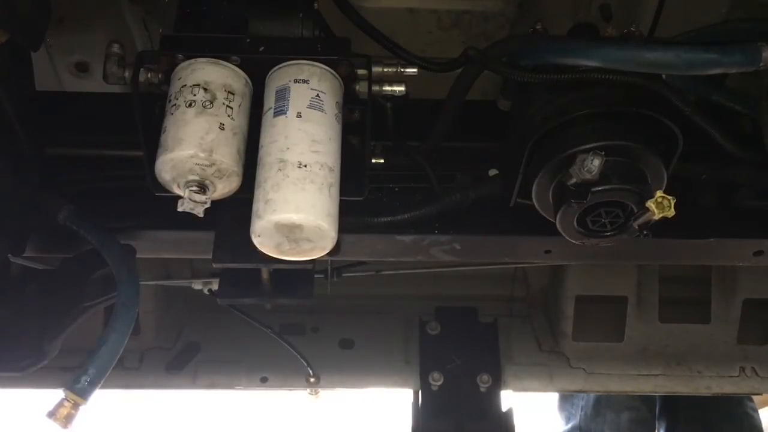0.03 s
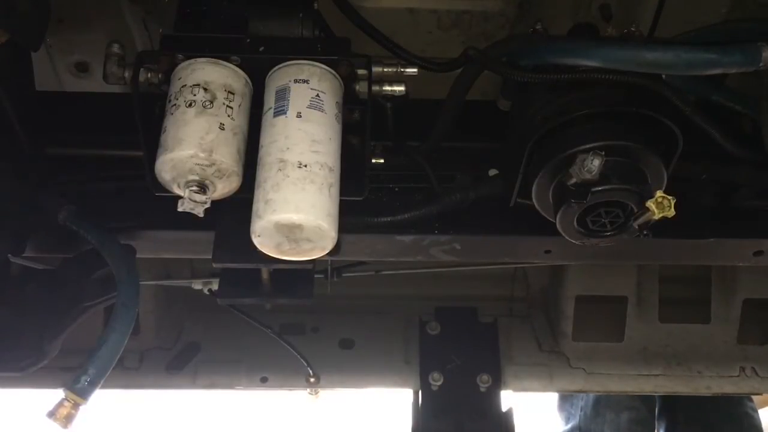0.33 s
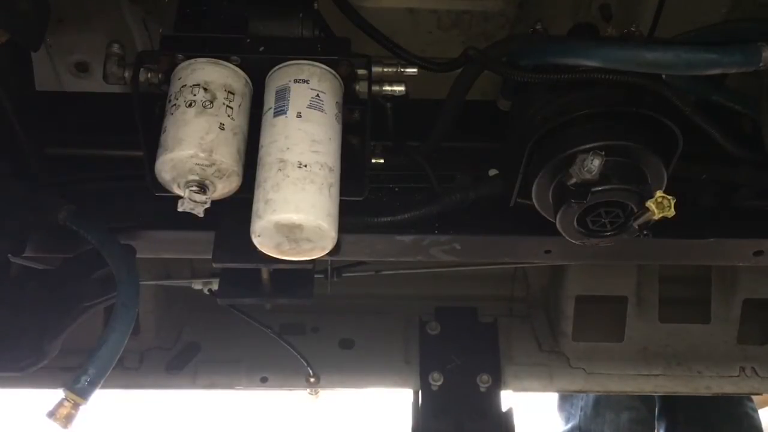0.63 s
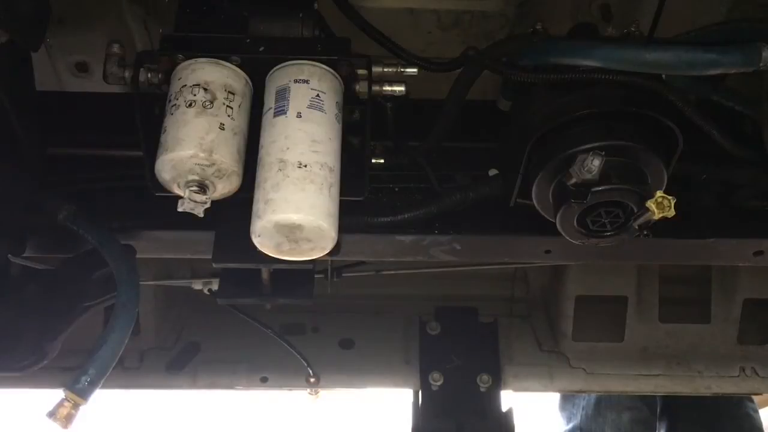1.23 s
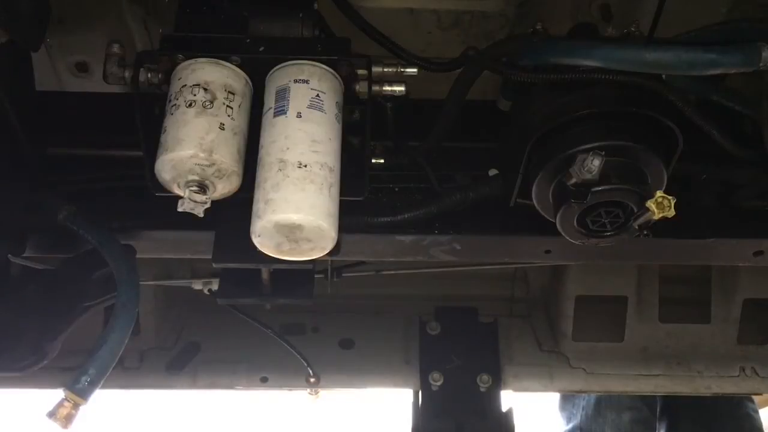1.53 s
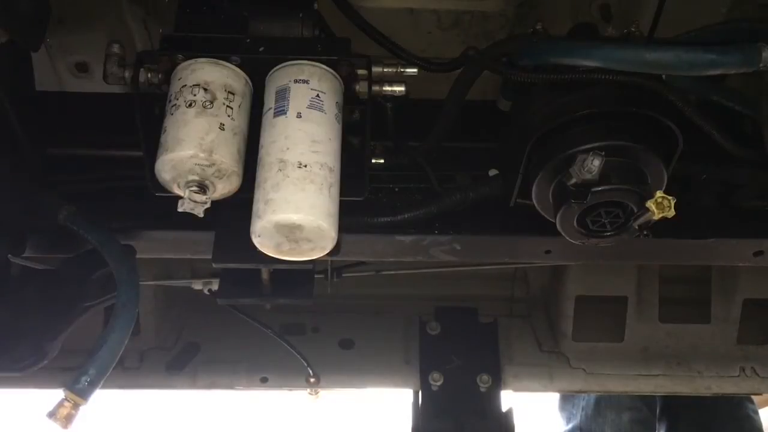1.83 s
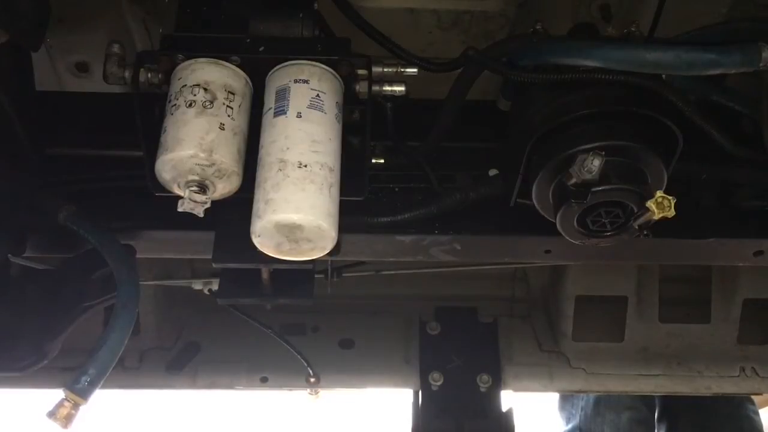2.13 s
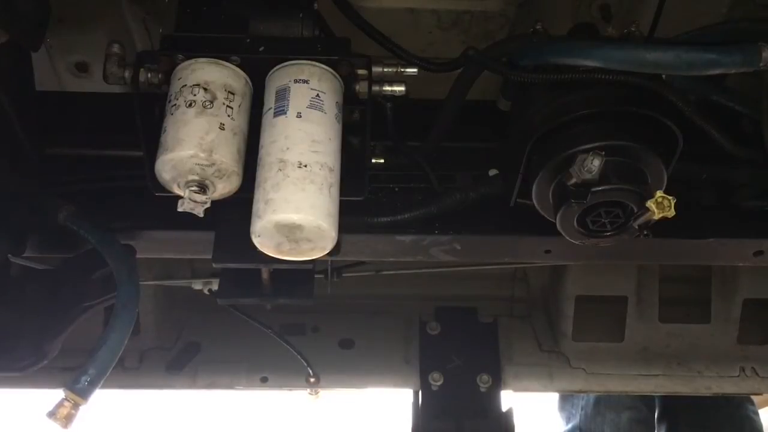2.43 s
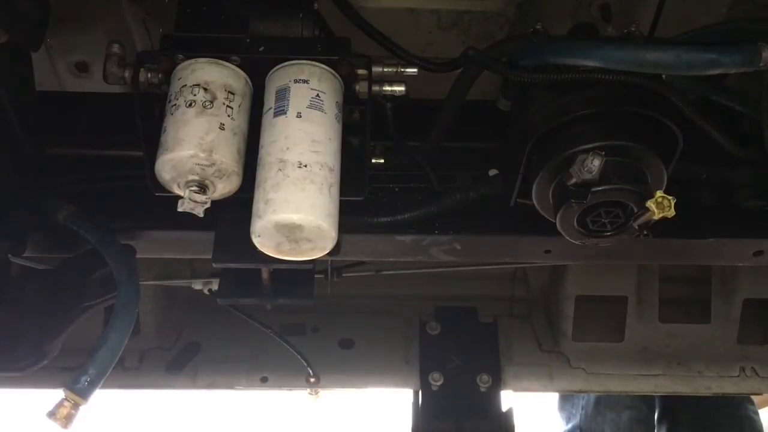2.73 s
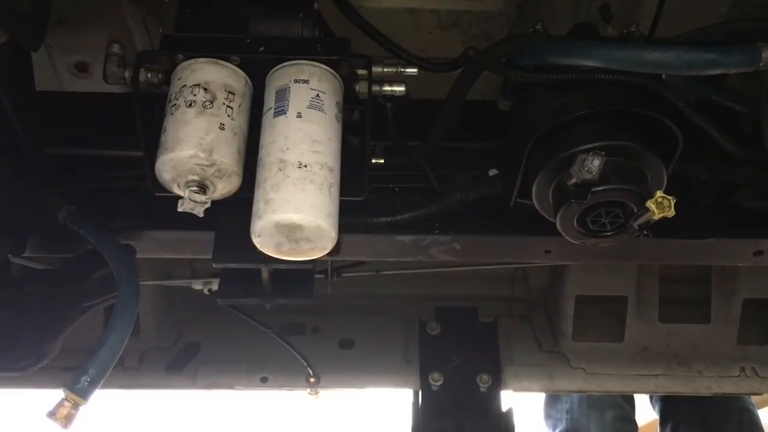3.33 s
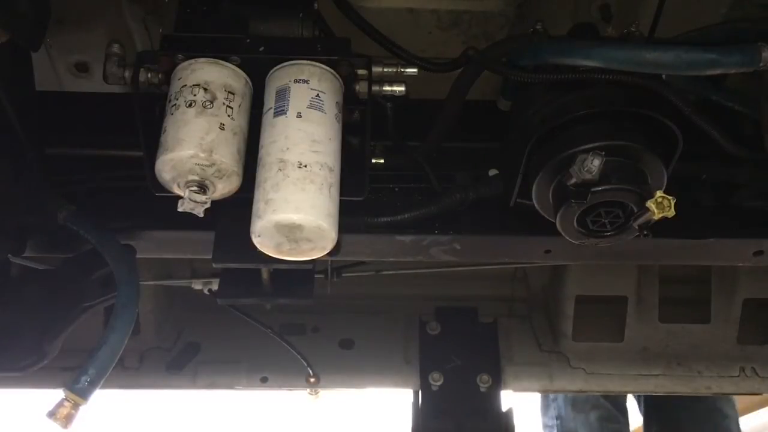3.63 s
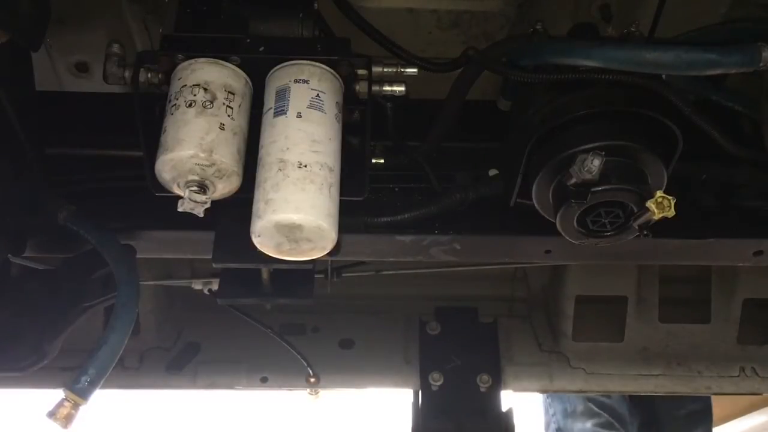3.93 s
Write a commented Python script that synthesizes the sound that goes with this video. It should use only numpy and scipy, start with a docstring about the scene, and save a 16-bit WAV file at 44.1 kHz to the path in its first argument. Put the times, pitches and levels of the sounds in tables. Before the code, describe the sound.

A starter motor cranks a truck's diesel engine in rapid grinding pulses, heard close up underneath. The engine does not fire, and the starter coasts to rest. A few small metal clicks follow over a faint, distant engine hum.

```python
"""Under a truck, one microphone close to the starter, with short echoes between frame and ground.
The electric starter cranks the diesel through 21 grinding compression strokes; it does not fire.
Each stroke slows the engine and loads the gear teeth, which ring the bell housing. The starter drops
out, the engine rocks back with two short hollow hoots, and the freed armature coasts to rest.
Farther off, a low engine drone carries on; close by come a few small clicks and a squeak."""
import sys
import numpy as np
from scipy import signal
from scipy.fft import rfft, irfft, next_fast_len
from scipy.io import wavfile
from scipy.ndimage import map_coordinates

SR = 44100
rng = np.random.default_rng(int(sys.argv[2]) if len(sys.argv) > 2 else 0)


def generate_wav(signal):
    """Clip the signal to [-1, 1] and save it as 16-bit WAV at the path in sys.argv[1]."""
    frames = np.transpose(np.atleast_2d(signal))
    scaled = np.clip(frames, -1, 1) * 32767
    pcm = np.round(scaled).astype(np.int16)
    wavfile.write(sys.argv[1], SR, pcm)


N = 176400

# compression strokes: start_s, grind_gain_db, low_tone_gain_db, peak_speed_share, under_load_s
COMPRESSIONS = [(-.018, 0.5, 3.5, .93, .06), (.069, -1, 3, 0.95, 0.061), (.169, 1.5, 2, 0.98, 0.039),
                (0.247, 0.5, 1, 1, 0.049), (.337, 1, 1, 0.98, 0.039), (.419, 1.5, 2, 1, 0.037),
                (0.499, 1.5, -0.5, 0.98, 0.04), (.579, 1, -2, 1, 0.035), (.656, 1.5, 0, 1, 0.035),
                (.729, 1.5, 2.5, .99, 0.05), (.818, 0, 3, 0.98, 0.039), (0.898, 0.5, -1.5, 0.99, .042),
                (.978, 1.5, 0.5, 1, 0.038), (1.059, 2, -3, 0.99, 0.035), (1.138, 1.5, 1.5, 1, 0.039),
                (1.216, 1.5, -0.5, 1, 0.037), (1.293, 1, 1, 0.99, 0.038), (1.367, 2, -0.5, 0.99, 0.035),
                (1.445, 1, -2.5, 1, 0.043), (1.525, 0.5, -1, 1, 0.041), (1.604, -1, -3, 0.96, .03)]
# gear tones, each sounding for part of a stroke: tooth_rate_multiple, gain_db, delay_s, decay_s
MESH_TONES = [(.76, -35.5, 0.0093, 0.24), (1.66, -20, .001, 0.012), (2.72, -21, 0.029, .2),
              (3.02, -16.5, 0.01, 0.038), (6.15, -13.5, 0.0087, 0.028), (5.9, -14.5, .032, 0.03),
              (9.35, -26.5, .002, 0.0092), (11.6, -20.5, 0.0056, 0.037), (12.3, -15, .003, 0.015)]
# broad response of bell housing and chassis: frequency_hz, gain_db
HOUSING_SHAPE = [(60, -40), (100, -25.5), (170, -5), (250, -2), (319, -13), (362, -8), (508, -5),
                 (590, -20.5), (861, -6.5), (1090, -10), (1160, -3), (1490, -2), (1960, -8), (2320, -6),
                 (2580, -14), (2810, -10.5), (3180, -3), (3610, -12), (4100, -8), (4860, -13.5), (6950, -7),
                 (7560, -13), (9500, -17.5), (10400, -24.5), (12500, -22.5), (15500, -37)]
# narrow housing resonances: pitch_hz, width_hz, gain_db
HOUSING_MODES = [(367, 18, -6.5), (511.8, 45.5, 2.5), (862, 120, -5.5), (1165, 18, 8), (1311, 21, -5.5),
                 (1544, 170, -2.5), (2414, 41, -6.5), (2890, 34, -1), (3080, 17, 1), (3286, 24, -0.5),
                 (3464, 32, -0.5), (3910, 38, 7.5), (5280, 60, -9.5), (6230, 15, 0.5), (6730, 55, -1.5),
                 (7090, 30, -8.5)]
# spectrum of the scraping teeth: frequency_hz, gain_db
SCRAPE_SHAPE = [(100, -35), (2000, -10), (4700, -12.5), (5300, 0.5), (6900, -9), (7700, -7), (9500, -12),
                (10500, -17.5), (15500, -22.5)]
# spectrum of the air pumped by the cylinders: frequency_hz, gain_db
PUFF_SHAPE = [(20, -42), (35, -26), (45, -1.5), (52, 8.5), (59, -3.5), (72, -2), (97, -23), (130, -16.5),
              (200, -50)]
# loudness of that air: time_s, level_db
PUFF_LEVELS = [(0, -30), (.38, -34.5), (.48, -25.5), (.72, -35.5), (.92, -24), (1.04, -27), (1.14, -33),
               (1.5, -26.5), (1.78, -27), (1.95, -38.5), (2.5, -53), (3, -66)]
# spectrum of the brushes on the coasting armature: frequency_hz, gain_db
BRUSH_SHAPE = [(150, -9), (250, -1.5), (400, -15.5), (520, -10.5), (600, -12.5), (700, -10), (1010, -4.5),
               (1100, -9), (1430, 1), (1730, -15.5), (2090, -6), (2400, -1.5), (2600, -9), (2850, -0.5),
               (3400, -7.5), (4800, -10.5), (5300, -8.5), (6000, -11), (7500, -20.5), (9000, -15),
               (10400, -27.5), (12400, -24.5), (15500, -37)]
# loudness of the brushes: time_s, level_db
BRUSH_LEVELS = [(1.62, -60), (1.66, -32), (1.83, -33), (1.9, -30.5), (2.08, -30.3), (2.25, -33.5),
                (2.42, -35.5), (2.5, -35.5), (2.55, -42), (2.585, -43), (2.605, -38.5), (2.645, -44.5),
                (2.715, -44), (2.78, -47), (2.85, -50), (2.93, -70), (3, -110)]
# hoots as the engine rocks back: start_s, length_s, pitch_hz, rise_share, level_db
ROCK_BACK_HOOTS = [(1.769, 0.044, 650, 0.12, -26.5), (1.786, 0.042, 400, 0.098, -21.5)]
# one thin squeak: start_s, length_s, pitch_hz, rise_share, level_db
THIN_SQUEAK = (3.803, .048, 6150, .2, -45)
# small metal clicks and knocks: start_s, level_db, centre_hz, width_octaves, decay_s
METAL_CLICKS = [(1.619, -16.5, 1280, 1.8, 0.015), (1.67, -21, 5540, 0.94, 0.0096),
                (1.679, -36, 14000, .25, 0.013), (1.853, -28.5, 590, 0.36, 0.021),
                (1.879, -26.5, 4960, 0.65, 0.0081), (2.785, -41, 430, 0.83, 0.049),
                (2.813, -37, 4000, 2, 0.01), (3.278, -52, 6000, .7, .003), (3.316, -44, 4460, 0.59, 0.0026),
                (3.383, -32.5, 2700, 0.67, 0.0021), (3.415, -38, 3550, 0.28, 0.012),
                (3.422, -31.5, 3470, 1.4, 0.0065), (3.436, -36.5, 3300, 1.7, 0.0072),
                (3.449, -44, 6000, 1, 0.0055), (3.634, -61, 8850, 0.36, .005),
                (3.879, -40, 1100, 1.19, 0.012), (3.93, -46, 2680, 0.63, 0.0094),
                (3.958, -53, 6000, 1, .004), (3.994, -51, 5000, 1, .005)]
# the engine farther off: time_s, pitch_hz, gain_db (on top of DRONE_DB)
DRONE_COURSE = [(1.9, 85.5, -46), (1.97, 93.2, -40), (2.69, 94.7, -34), (2.83, 106, -35.5),
                (3.09, 95.7, -27), (3.17, 86.6, -53), (3.27, 92.7, -28.5), (3.68, 94.0, -32.5),
                (3.83, 85.3, -40.5), (4.0, 95.1, -35)]
# spectrum of the open air: frequency_hz, gain_db
AIR_SHAPE = [(15, -51), (30, -22.5), (45, -14.5), (62, -7.5), (96, -4.5), (133, -15), (204, -14.5),
             (260, -28), (360, -31), (500, -37.5), (750, -36), (1020, -32), (1400, -34), (2000, -38),
             (3200, -47), (6000, -56.5), (9000, -61), (10500, -65.5), (15500, -69.5)]
# spectrum of a faint shuffling: frequency_hz, gain_db
SHUFFLE_SHAPE = [(200, -9), (800, -15), (3000, -3.5), (5000, -11.5), (7300, -11), (10000, -20),
                 (15500, -29.5)]
# loudness of the shuffling: time_s, level_db
SHUFFLE_LEVELS = [(3.72, -84), (3.8, -56), (3.9, -57), (4, -57)]

MESH_HZ, SPEED_SAG = 564.9, 0.155  # tooth rate at full speed; share of speed lost in a stroke
ATTACK_S, RELEASE_S = 0.0055, 0.0092  # rise and fall of the tooth load
DROP_OUT_S, DROP_FADE_S = 1.635, 0.016  # the pinion leaves the ring gear
TEETH_DB, TOOTH_JITTER_S, TOOTH_SCATTER_DB = -21.5, 0.00005, 4
GRIND_DB, SCRAPE_DB, SCRAPE_DECAY_S = -19, -20, 0.02
SLACK_DB, SCRAPE_SLACK_DB = -10, -14.5  # load left between strokes
RING_DB, TONE_RING_DB = -22.5, -8  # housing rung by the teeth and by the gear tones
WHINE_RATIO, WHINE_DB = 7.8, -23  # pitch as a multiple of the tooth rate
COAST_TURN_HZ, COAST_STOP_S, RUB_SWING_DB = 42.45, 2.85, 1.5
DRONE_DB, AIR_DB = -3.5, -37.5
ECHO_T60_S, ECHO_DB = 0.12, -5.5
LOW_CUT_HZ, TOP_HZ = 36, 15750


def grinding_gears(teeth):
    """Teeth strike and grind, ringing the housing; the first contact of a stroke scrapes brightest."""
    force = np.hypot(tooth_load(), amp(SLACK_DB) * engaged())
    strike_s = np.interp(np.arange(1, int(teeth[-1])), teeth, clock())
    jitter, scatter = rng.standard_normal((len(strike_s), 2)).T
    index = np.clip(np.round((strike_s + TOOTH_JITTER_S * jitter) * SR).astype(int), 0, N - 1)
    blows = np.bincount(index, amp(TOOTH_SCATTER_DB * scatter), N)
    grind = amp(GRIND_DB) * unit(rng.standard_normal(N))
    drive = force * (amp(TEETH_DB) * unit(blows - blows.mean()) + grind)
    body = drive.std() * unit(coloured(drive, HOUSING_SHAPE))
    ring = amp(RING_DB) * np.sqrt(np.mean(force ** 2)) * unit(filtered(drive, housing_response))
    scrape_force = np.hypot(tooth_load(decay=SCRAPE_DECAY_S), amp(SCRAPE_SLACK_DB) * engaged())
    return body + ring + amp(SCRAPE_DB) * scrape_force * noise(SCRAPE_SHAPE)


def gear_tones(teeth):
    """Rough tones of the loaded gears fall as the engine slows, swelling across the housing's modes."""
    tones = np.zeros(N)
    for multiple, db, delay, decay in MESH_TONES:
        level = amp(db + 3.5 * wobble(200)) * tooth_load(delay, decay, low_tone=multiple < 4)
        tones += level * np.sin(2 * np.pi * multiple * teeth + 0.45 * wobble(380))
    return tones + amp(TONE_RING_DB) * filtered(tones, housing_response)


def crank_speed():
    """Each compression slows the engine until the load lets go; it springs back for the next."""
    knots = []
    for start, _, _, speed, hold in COMPRESSIONS:
        knots.append((start + 0.006, speed))  # fastest just after the teeth load up
        knots.append((start + hold - 0.0032, speed * (1 - SPEED_SAG)))
    return curves(knots)[0]


def tooth_load(delay=0, decay=np.inf, low_tone=False):
    """Force on the teeth rises, holds and lets go in each stroke; low tones have their own gains."""
    force = np.zeros(N)
    lead_s = 0.0014  # the teeth touch just before the compression bites
    for start, grind_db, low_tone_db, _, hold in COMPRESSIONS:
        span = slice(max(int((start - lead_s) * SR), 0), int(start * SR) + SR // 6)
        t = clock()[span] - start
        rise = np.sin(np.pi / 2 * np.clip((t + lead_s - delay) / ATTACK_S, 0, 1)) ** 2
        fall = np.exp(-np.maximum(t - hold, 0) / RELEASE_S - np.maximum(t - delay, 0) / decay)
        force[span] += amp(low_tone_db if low_tone else grind_db) * rise * fall
    return force * engaged()


def engaged():
    """1 while the starter drives the engine, then fading."""
    return np.exp(-np.maximum(clock() - DROP_OUT_S, 0) / DROP_FADE_S)


def housing_response(hz):
    """The bell housing's narrow modes add up with alternating signs."""
    return sum((-1) ** k * amp(db) * 1j * hz * width / (pitch ** 2 - hz ** 2 + 1j * hz * width)
               for k, (pitch, width, db) in enumerate(HOUSING_MODES))


def armature_whine(teeth):
    """The armature sings on between the strokes, rising as the load lets go."""
    level = amp(WHINE_DB + 1.8 * wobble(150)) * engaged()
    return level * np.sin(2 * np.pi * WHINE_RATIO * teeth + 0.87 * wobble(450))


def armature_coast():
    """The freed armature rubs on its brushes, the rub swelling once a turn, ever slower."""
    level_db, = curves(BRUSH_LEVELS)
    turn_hz = COAST_TURN_HZ * np.clip((COAST_STOP_S - clock()) / (COAST_STOP_S - DROP_OUT_S), 0, 1)
    swing_db = RUB_SWING_DB * np.sin(2 * np.pi * np.cumsum(turn_hz) / SR) + 0.76 * wobble(250)
    return amp(level_db + swing_db) * noise(BRUSH_SHAPE)


def cylinder_puffs():
    """Low throb of the air that the cylinders pump."""
    level_db, = curves(PUFF_LEVELS)
    air = noise(PUFF_SHAPE)
    steadied = air / np.abs(signal.hilbert(air)) ** 0.53
    return amp(level_db) * unit(steadied)


def chirp(start, length, hz, rise, db, blur_rad):
    """A hoot or squeak: a short, rough rising tone that swells and fades."""
    progress = np.clip((clock() - start) / length, 0, 1)
    phase = 2 * np.pi * np.cumsum(hz * (1 + rise * np.sin(progress * np.pi / 2))) / SR
    return amp(db) * np.sin(np.pi * progress) * np.sin(phase + blur_rad * wobble(hz / 5))


def metal_clicks():
    """Each contact is a short burst of noise in its own band."""
    out, t = np.zeros(N + SR), np.arange(SR // 5) / SR
    hz = np.fft.rfftfreq(len(t), 1 / SR) + 1
    treble_cut = 1 / np.sqrt(1 + (hz / 10000) ** 4)
    for start, db, centre, octaves, decay in METAL_CLICKS:
        band = treble_cut / (1 + (np.log2(hz / centre) / octaves) ** 2) ** 1.24
        burst = unit(irfft(rfft(rng.standard_normal(len(t))) * band, len(t)))
        out[round(start * SR):][:len(t)] += amp(db) * burst * np.exp(-t / decay)
    return out[:N]


def underside(x):
    """Dense short echoes between frame and ground reach the microphone after the direct sound."""
    t = np.arange(SR // 4) / SR
    tail = rng.standard_normal(len(t)) * amp(-60 * t / ECHO_T60_S) * (t > 0.002)
    return x + amp(ECHO_DB) * signal.fftconvolve(x, tail / np.linalg.norm(tail))[:N]


def engine_drone():
    """An engine farther off hums on one low, wavering tone."""
    hz, db = curves(DRONE_COURSE)
    level = amp(DRONE_DB + db + 1.8 * wobble(22))
    return level * np.sin(2 * np.pi * np.cumsum(hz) / SR + 0.29 * wobble(20))


def yard():
    """Open air rumbles around the truck, with a faint shuffle at the end."""
    air = amp(AIR_DB + 0.91 * wobble(22)) * noise(AIR_SHAPE)
    shuffle_db, = curves(SHUFFLE_LEVELS)
    return air + amp(shuffle_db + 2 * wobble(110)) * noise(SHUFFLE_SHAPE)


def amp(db):
    """Decibels to gain."""
    return 10 ** (np.asarray(db) / 20)


def unit(x):
    """Scale to rms 1."""
    return x / np.sqrt(np.mean(x ** 2) + 1e-20)


def clock():
    """Time of each sample."""
    return np.arange(N) / SR


def curves(rows):
    """One value per sample for each column after the time."""
    times, *columns = np.transpose(rows)
    return [np.interp(clock(), times, column) for column in columns]


def wobble(rate):
    """A smooth random curve, rate knots a second."""
    return map_coordinates(rng.standard_normal(int(N * rate / SR) + 4), [np.arange(N) * rate / SR])


def filtered(x, response):
    """x through a complex frequency response."""
    size = 2 * next_fast_len(N // 2 + SR // 4)
    return irfft(rfft(x, size) * response(np.fft.rfftfreq(size, 1 / SR)), size)[:N]


def shape_gain(hz, shape):
    """Gain of a (frequency_hz, gain_db) shape along log frequency."""
    knots_hz, db = np.transpose(shape)
    return amp(np.interp(np.log(hz + 1), np.log(knots_hz + 1), db))


def coloured(x, shape):
    """x through a causal, minimum-phase filter of the given shape."""
    def response(hz):
        cepstrum = irfft(np.log(shape_gain(hz, shape)))
        half = len(cepstrum) // 2
        cepstrum[1:half] *= 2
        cepstrum[half + 1:] = 0
        return np.exp(rfft(cepstrum))
    return filtered(x, response)


def noise(shape):
    """Coloured noise of rms 1."""
    return unit(filtered(rng.standard_normal(N), lambda hz: shape_gain(hz, shape)))


def scene():
    """Starter, clicks and squeak echo under the truck; hoots, puffs and background arrive direct."""
    teeth = np.cumsum(MESH_HZ * crank_speed()) / SR  # count of teeth meshed so far
    starter = grinding_gears(teeth) + gear_tones(teeth) + armature_whine(teeth) + armature_coast()
    small_sounds = metal_clicks() + chirp(*THIN_SQUEAK, blur_rad=0.8)
    hoots = sum(chirp(*row, blur_rad=0.9) for row in ROCK_BACK_HOOTS)
    return (underside(starter + small_sounds) + hoots + cylinder_puffs() + engine_drone() + yard())[None]


def record(dry):
    """One microphone channel: peaks round off softly; the deepest bass and highest treble are cut."""
    rounded = dry[0] / (1 + np.abs(dry[0]) ** 4) ** (1 / 4)
    def passband(hz):
        return 1 / (1 + (hz / TOP_HZ) ** 300) / np.sqrt(1 + (LOW_CUT_HZ / (hz + 1)) ** 8)
    return filtered(rounded, passband)[None]


dry = scene()
out = record(dry)
generate_wav(out)
```